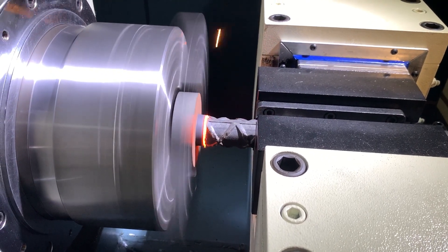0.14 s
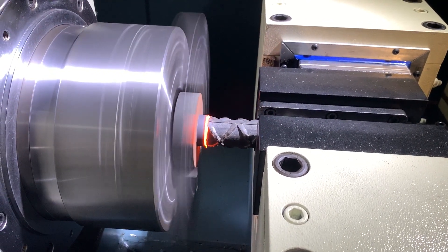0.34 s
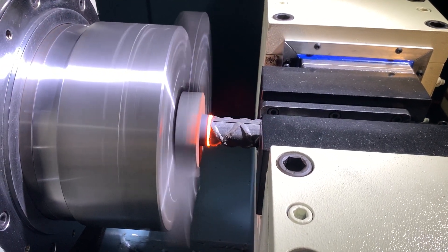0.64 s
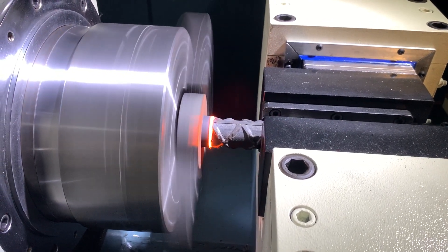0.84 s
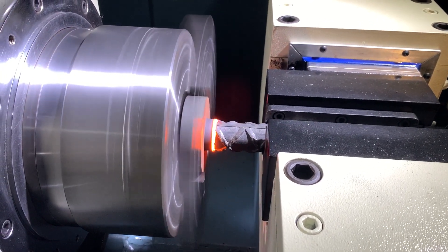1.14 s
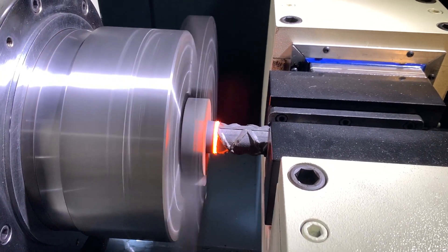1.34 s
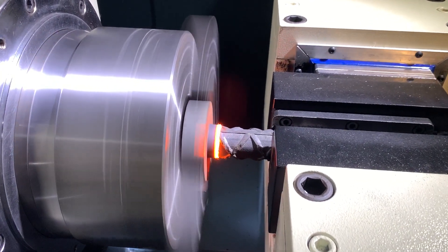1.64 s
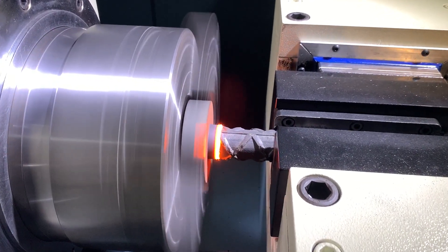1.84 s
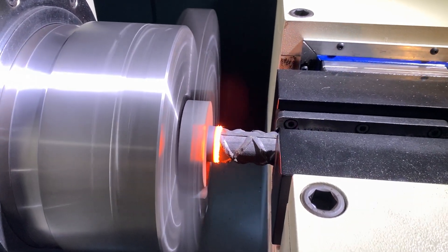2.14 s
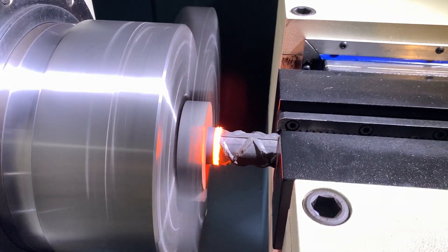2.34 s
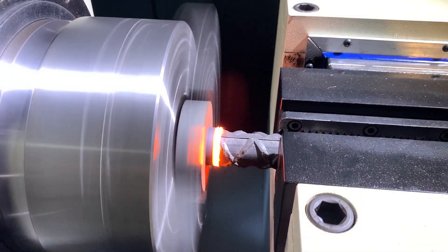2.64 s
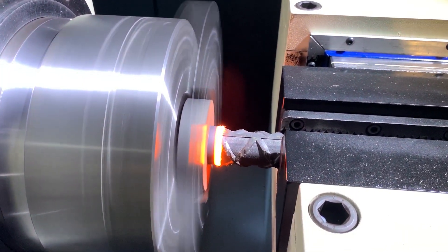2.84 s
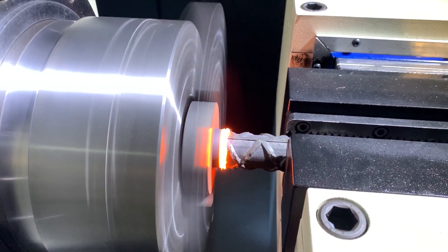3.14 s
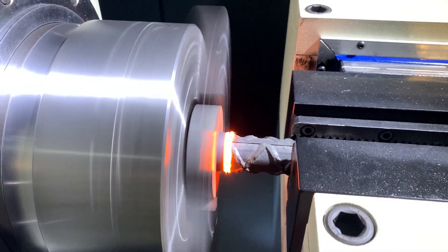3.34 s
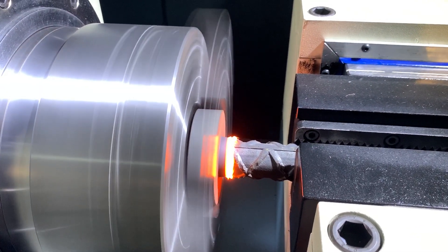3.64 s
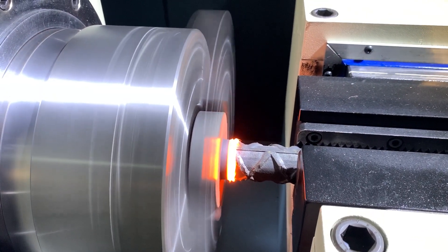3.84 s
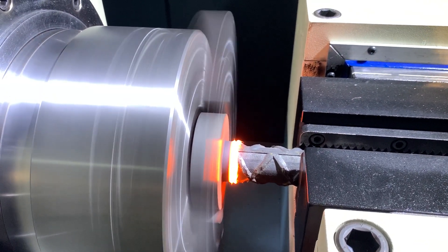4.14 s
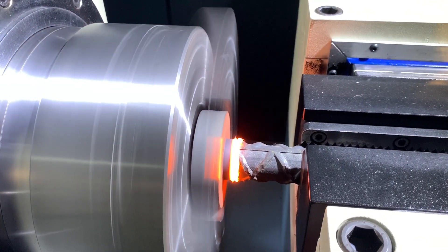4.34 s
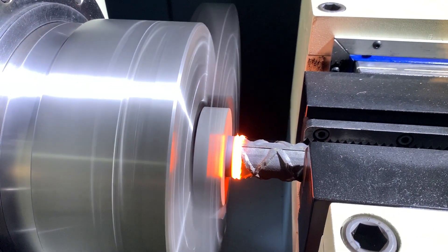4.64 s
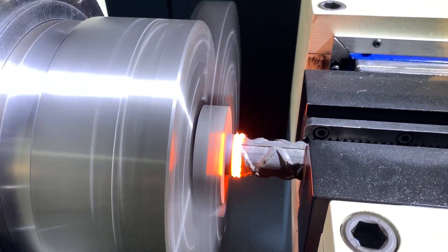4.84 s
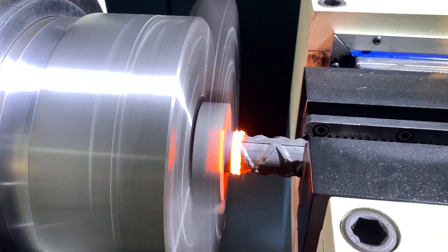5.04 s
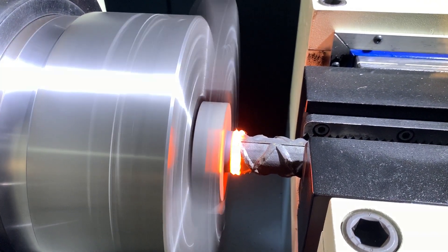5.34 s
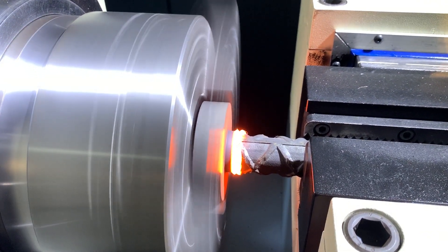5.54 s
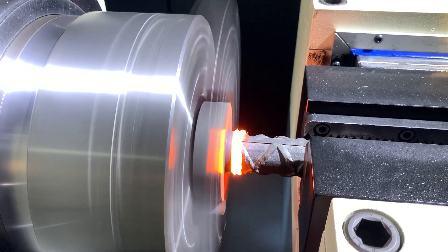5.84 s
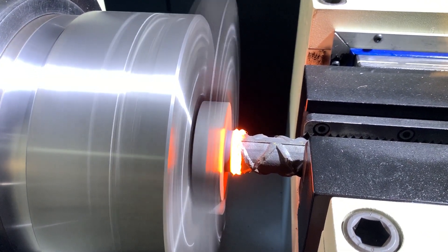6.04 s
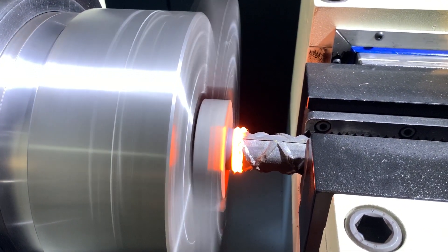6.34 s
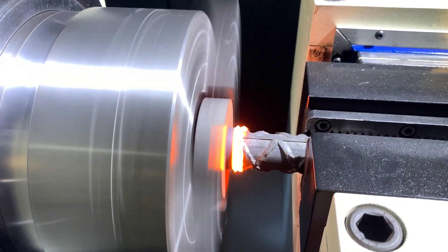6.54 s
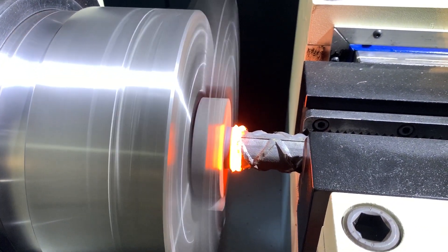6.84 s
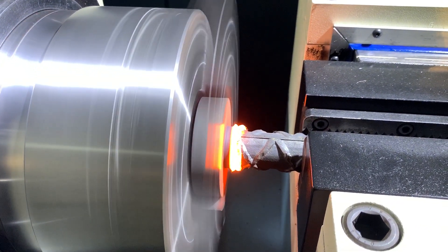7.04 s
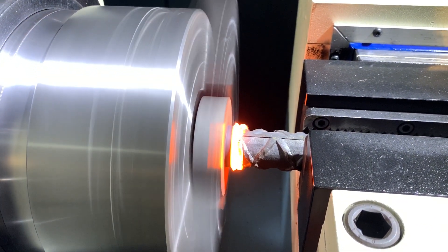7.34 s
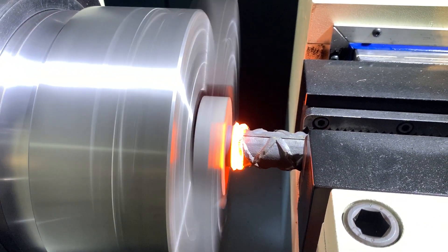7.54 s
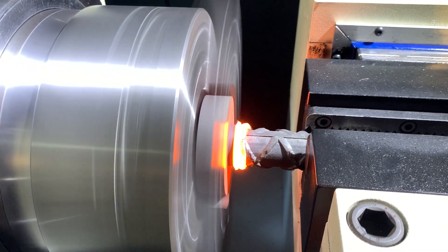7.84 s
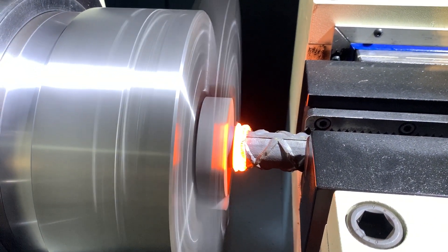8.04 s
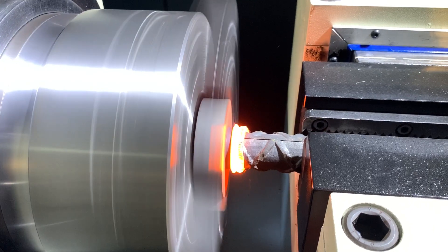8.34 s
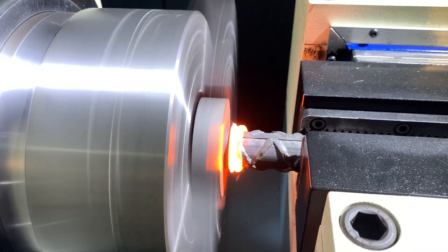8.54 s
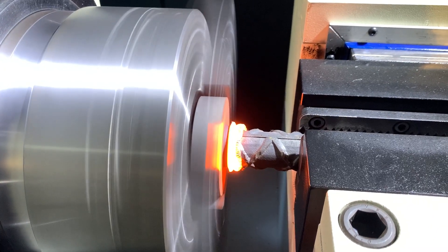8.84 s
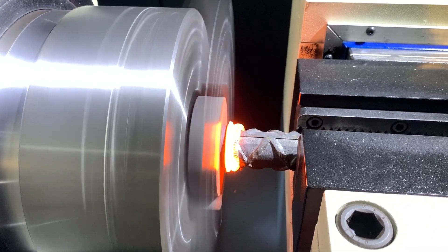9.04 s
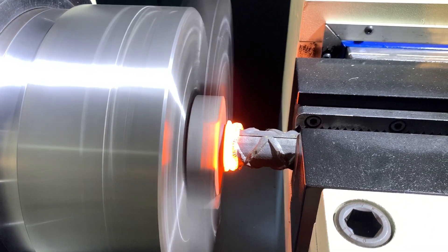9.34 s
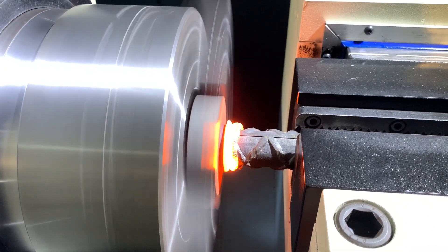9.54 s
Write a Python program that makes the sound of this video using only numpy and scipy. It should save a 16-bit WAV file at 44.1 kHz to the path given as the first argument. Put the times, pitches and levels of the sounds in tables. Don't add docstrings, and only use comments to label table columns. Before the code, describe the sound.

Steady high mechanical whine from a fast spinning machine spindle, with gritty roar, low hum and hiss, plus occasional dull bumps on the microphone.

```python
import sys
import numpy as np
from scipy import signal
from scipy.fft import irfft
from scipy.io import wavfile
from scipy.ndimage import uniform_filter1d

SR = 44100
rng = np.random.default_rng(int(sys.argv[2]) if len(sys.argv) > 2 else 0)


def output_pcm(signal):
    pcm = np.clip(np.atleast_2d(signal).T, -1, 1) * 32767
    wavfile.write(sys.argv[1], SR, np.round(pcm).astype(np.int16))


def volts_from_decibels(level):
    exponent = np.asarray(level, float) / 20
    return 10 ** exponent


N = 427769

TEETH, HUM_ORDER, CAGE_ORDER = 47, 3, .405
TOOTH_HZ, SOUND_MM_PER_S = 1394, 343000
LOADED_HZ, FREE_HZ = 29.604, 29.684
PUMP_LOADED_HZ, PUMP_FREE_HZ = 29.832, 29.89
HUM_DB, HUM_SHORT_DB, HUM_GROW_S, HUM_WAVER_DB = -37.5, -14.5, 2.5, 0.9
ROAR_LOADED_DB, ROAR_FREE_DB, RUMBLE_LOADED_DB, RUMBLE_FREE_DB = -2, -0.3, -4.5, -2.7
CONTROL_S = np.arange(0, N / SR + 1, 1 / 64)

# time in seconds, shaft speed in Hz (turns per second).
SHAFT_SPEED = [(0, 29.619), (.5, 29.604), (.99, 29.61), (1.74, 29.625), (2.74, 29.636), (4.23, 29.665),
               (5.22, 29.678), (6.22, 29.687), (7.46, 29.683), (9.7, 29.68)]
# order of the drive shaft, loaded level in dB, free level in
# dB, left lead in rad.
DRIVE_ORDERS = [(9.98, -58, -56, -.2), (12.29, -58, -54, .6), (15, -55, -52, .4), (24.89, -60, -57, -2.8),
                (47.79, -55, -54, -2.8), (48.01, -60, -50, 2.5), (48.6, -46, -41, 2.3),
                (49.01, -56, -50, 2.4), (49.73, -55, -54, 3.1), (51.99, -57, -56, -1.4),
                (53.7, -58, -55, -1.2), (57.72, -58, -53, -2.6), (69.6, -59, -57, .2), (91.01, -60, -51, 2),
                (93, -55, -50, 1.5), (94.98, -51, -52, 1.2), (95.62, -50, -52, 1.8), (97.02, -56, -51, .5),
                (98.78, -61, -48, 3), (99, -51, -51, 2.4), (100, -57, -53, .7), (139.83, -51, -53, -1.7),
                (142.18, -49, -51, -3.1), (158.08, -56, -51, .2), (170.23, -62, -52, .8),
                (182.02, -59, -53, -2.6), (199.86, -52, -52, -.7), (200.4, -59, -53, -1.1),
                (223.62, -48, -46, 1), (235, -49, -56, -.3),
                (45.4, -60, -56, .6), (142, -47, -55, .7), (193.3, -48, -52, .5), (198.5, -53, -51, .5),
                  (271.94, -43, -54, -1.2), (88, -54, -53, 2), (104, -62, -51, 2), (5, -52, -56, .3)]
# time in seconds, change in mm of the echo path by wall, by bed and by guard.
HAND_DRIFT = [(0.0, 1, -1, -3), (0.15, 3.5, 0, 6), (0.45, -5, -3, -12), (0.75, 0, -4, -13.1),
              (1.05, -3.5, -6.4, -6.9), (1.35, -5.2, -15, 24), (1.65, -16, -17, 19.5),
              (1.9, -12, -10, 11.5), (2.15, -11.5, -1, -6.8), (2.4, -4, 10, -5.5), (2.75, 15, 21, 3),
              (3.3, 38, 14, -14.6), (3.85, 72, 11, -23), (4.5, 89.5, 23, -21), (5.5, 110, 22.2, -27),
              (6.6, 114.2, 17, -31.5), (8.0, 119.5, 26.7, -31), (9.7, 115, 29.5, -39)]
# tooth-rate multiple, left and right level in dB, left and right phase in rad.
DIRECT_PATH = [(1, -46.5, -32.5, -1.72, -0.0), (2, -26.5, -29, 0.18, -0.0), (3, -31.5, -35.0, 2.5, 0.011),
               (4, -56.3, -40, -0.4, 0.0)]
# tooth-rate multiple, left and right level in dB, left and right phase in rad.
WALL_ECHO = [(1, -47.5, -37.5, 0.26, 1.25), (2, -46.5, -30.5, 3.5, -3), (3, -49.5, -42, -0.8, -1.4),
             (4, -37.0, -36.0, -0.32, 1.8)]
# tooth-rate multiple, left and right level in dB, left and right phase in rad.
BED_ECHO = [(1, -49.5, -33, 2.6, -2.93), (2, -31.0, -44, 2.72, 0.76), (3, -38.5, -28.5, 0.31, -3.09),
            (4, -50, -38.5, 3, -0.75)]
# tooth-rate multiple, left and right level in dB, left and right phase in rad.
GUARD_ECHO = [(1, -42.5, -51.5, -0.9, -2.85), (2, -30.5, -31.5, -3, 2.4), (3, -39.5, -41.1, 1.35, -2.5),
              (4, -49, -40, -0.92, 0.9)]
# order of the
# pump shaft, loaded level in dB, free level in dB, left lead in rad.
PUMP_ORDERS = [(30, -45, -48, -1.9), (48, -49, -50, -1.1), (54, -51, -52, 2), (66, -57, -52, -.9),
               (72, -59, -51, -1.6), (78, -55, -50, 2.5), (84, -53, -51, -2.4), (90, -54, -54, -.5),
               (96, -49, -50, 2.3), (102, -56, -54, -1.6), (108, -53, -48, .1), (114, -54, -42, 2.1),
               (120, -48, -54, 1.4), (126, -53, -47, -3.1), (138, -57, -53, 2.8), (144, -43, -42, 2.2),
               (150, -44, -50, .1), (156, -51, -45, -.7), (162, -48, -45, 1.5), (168, -53, -48, -2.5),
               (174, -49, -51, 2.6), (180, -55, -54, -2.5), (192, -49, -47, -2.8), (198, -46, -49, -2.1),
               (210, -65, -54, .2), (216, -50, -54, -1.1), (228, -57, -54, 1.7), (246, -56, -59, 3.1),
               (252, -53, -60, -2.1), (258, -58, -55, -1.6),
               (79, -62, -57, -2.7), (81, -57, -55, 1.1), (83, -62, -54, 3.1), (91, -63, -55, -1.4),
                 (149, -54, -49, -.1), (151, -51, -51, 2.2), (158, -61, -51, .9), (175, -56, -50, 0),
                 (193, -60, -48, -.1), (197, -54, -46, -2.9), (223, -59, -48, 1.2), (42, -54, -59, 2.3),
                 (60, -56, -62, 1), (264, -50, -60, 0)]
# start in seconds, thud peak in dB, final thud pitch in Hz, thud length in seconds,
# knock peak in dB.
HOUSING_BUMPS = [(2.862, -28, 63.6, 0.023, -33), (2.91, -31, 60, 0.027, -50), (5.032, -30, 72, 0.015, -36),
                 (5.753, -40, 90, .015, -30.5), (5.851, -26, 71, 0.025, -33),
                 (5.865, -30, 80, 0.016, -30.5), (6.118, -31, 70, 0.03, -32), (6.256, -32, 60, .02, -39),
                 (7.81, -25, 55, 0.031, -29), (8.443, -27, 50, 0.023, -35), (8.487, -45, 60, .015, -36),
                 (9.224, -29, 58.4, 0.028, -32)]
# frequency in Hz, density in dB per Hz.
ROAR_SPECTRUM = [(18, -82), (30, -74), (50, -65), (120, -68), (250, -71), (600, -72), (1100, -76),
                 (1800, -73), (2400, -70), (3400, -71), (4400, -66), (5400, -68), (7000, -76), (9500, -95)]
# frequency in Hz, shared part from 0 to 1.
ROAR_LIKENESS = [(25, .6), (60, .8), (150, .88), (300, .88), (500, .6), (800, .35), (3000, .25)]
# frequency in Hz, width in Hz, level in dB over the roar.
CASING_PANELS = [(172, 40, 6.5), (301, 8.7, 4), (359, 21, 9), (445.8, 9.2, 12), (55, 21, 5.5), (659, 28, 7),
                 (1428, 98, 9), (2793, 72, 7), (4200, 130, 4.5), (6610, 480, 7)]
# frequency in Hz, density in dB per Hz.
HISS_SPECTRUM = [(4500, -80), (6000, -78.5), (7500, -73.5), (8200, -69), (9000, -75.5), (10000, -77),
                 (12000, -84), (13000, -79.5), (15500, -91.5), (16000, -110)]
# frequency in Hz, left over right in dB.
PORT_TILT = [(300, 0), (800, 3), (1300, 1), (3300, 0), (4500, 0), (6500, -4), (8200, -2.5), (9500, -0.5)]


def gearbox():
    turns = np.cumsum(curve(*np.transpose(SHAFT_SPEED))) / SR
    hum_db = HUM_DB + HUM_SHORT_DB * np.exp(-CONTROL_S / HUM_GROW_S) + HUM_WAVER_DB * wander(9.3)
    hum = volts_from_decibels(hum_db)
    out = tone(HUM_ORDER * turns, [hum * np.exp(.38j), hum])
    flutter_turns = curve(CONTROL_S, .008 * wander(20))
    for k in range(4):
        out += tone((k + 1) * (TEETH * turns + flutter_turns), paths(k) * volts_from_decibels(.5 * wander(25)))
    shaft_turns = turns + curve(CONTROL_S, 0.00023 * wander(1.8))
    cage_turns = CAGE_ORDER * turns + curve(CONTROL_S, 0.0001 * wander(2.8))
    out += grain(shaft_turns, db=2.0, spread_db=6)
    out += grain(cage_turns, db=2.5, spread_db=3.5)
    return out + orders(DRIVE_ORDERS, turns, trim_db=-.2, waver_db=1.6, slip_turns=.035, side_db=2)


def paths(k):
    s, *moved_mm = np.transpose(HAND_DRIFT)
    out = 0
    for way, mm in zip((DIRECT_PATH, WALL_ECHO, BED_ECHO, GUARD_ECHO), [0 * s] + moved_mm):
        _, left_db, right_db, left_rad, right_rad = way[k]
        late_rad = 2 * np.pi * (k + 1) * TOOTH_HZ * np.interp(CONTROL_S, s, mm) / SOUND_MM_PER_S
        ports = volts_from_decibels([left_db, right_db]) * np.exp(1j * np.array([left_rad, right_rad]))
        out = out + ports[:, None] * np.exp(-1j * late_rad)
    return out


def pump():
    speed_hz = PUMP_LOADED_HZ + (PUMP_FREE_HZ - PUMP_LOADED_HZ) * ease(np.arange(N) / SR)
    turns = np.cumsum(speed_hz) / SR
    flaws = grain(turns + curve(CONTROL_S, 0.00022 * wander(8)), db=4.5, spread_db=4.0)
    strokes = orders(PUMP_ORDERS, turns, trim_db=-.6, waver_db=1.7, slip_turns=.035, side_db=2)
    return flaws + strokes


def bumps():
    out, t = np.zeros(N), np.arange(8000) / SR
    for s, thud_db, hz, length_s, knock_db in HOUSING_BUMPS:
        sag_turns = hz * (t + 2.38 * 0.01135 * (1 - np.exp(-t / 0.0067)))
        thud = -np.sin(2 * np.pi * sag_turns) * np.tanh(t / 0.0099) * np.exp(-(t / (1.3 * length_s)) ** 2)
        knock_hz = 300 + 100 * rng.random()
        knock = -np.sin(2 * np.pi * knock_hz * t) * (t / 0.002) * np.exp(1 - t / 0.0027)
        part = out[round(s * SR):][:len(t)]
        part += volts_from_decibels(thud_db) * thud + volts_from_decibels(knock_db) * knock
    return out


def hall():
    frames, hz = N // 512 + 5, np.fft.rfftfreq(2048, 1 / SR)
    patches = uniform_filter1d(rng.standard_normal((frames, len(hz))), size=6, axis=0)
    patches = uniform_filter1d(patches, size=12, axis=1).T
    patches /= patches.std()
    free = ease(np.arange(frames) * 512 / SR)
    roar_db = ROAR_LOADED_DB + (ROAR_FREE_DB - ROAR_LOADED_DB) * free
    rumble_db = RUMBLE_LOADED_DB + (RUMBLE_FREE_DB - RUMBLE_LOADED_DB) * free
    low = 1 / (1 + (hz / 500) ** 4)[:, None]
    swell_db = low * rumble_db + (1 - low) * roar_db
    roar_field_db = casing_db(hz)[:, None] + swell_db + 1.2 * patches
    roar_lead_rad = 3.5 / (1 + (620 / (hz + 1)) ** 4)
    roar = noise(hz, roar_field_db, read(ROAR_LIKENESS, hz), roar_lead_rad)
    hiss_lead_rad = -2 * np.pi * (hz - 590) / 3220
    alike = np.interp(hz, [7000, 9000, 10500], [.7, .5, .96])
    hiss = noise(hz, read(HISS_SPECTRUM, hz)[:, None] + 1.35 * patches, alike, hiss_lead_rad)
    return roar + hiss


def casing_db(hz):
    ringing = sum((volts_from_decibels(2 * db) - 1) / (1 + (2 * (hz - f) / width) ** 2) for f, width, db in CASING_PANELS)
    return read(ROAR_SPECTRUM, hz) + 10 * np.log10(1 + np.maximum(ringing, 0))


def noise(hz, field_db, same, lead_rad):
    a, b, c, d = rng.standard_normal(field_db.shape[::-1] + (4,)).T
    same = np.clip(same, 0, 1)[:, None]
    right = a + 1j * b
    left = same * right * np.exp(1j * lead_rad)[:, None] + np.sqrt(1 - same ** 2) * (c + 1j * d)
    half_tilt = np.array([.5, -.5])[:, None, None]
    z = np.array([left, right]) * volts_from_decibels(field_db + half_tilt * read(PORT_TILT, hz)[:, None])
    return signal.istft(z * np.sqrt(SR / 2048 * 1.5), nperseg=2048, noverlap=1536)[1][:, :N]


def tone(turns, ports):
    angle = (2 * np.pi * (turns % 1)).astype(np.float32)
    cos, sin = np.cos(angle), np.sin(angle)
    return np.sqrt(2) * np.array([curve(CONTROL_S, p.real) * cos - curve(CONTROL_S, p.imag) * sin for p in ports])


def orders(table, turns, trim_db, waver_db, slip_turns, side_db):
    out, free = np.zeros((2, N), np.float32), np.clip(ease(CONTROL_S), 0, 1)
    for order, loaded_db, free_db, lead_rad in table:
        level_db = loaded_db + (free_db - loaded_db) * free + trim_db + waver_db * wander(6)
        size = curve(CONTROL_S, np.sqrt(2) * volts_from_decibels(level_db)).astype(np.float32)
        slip = curve(CONTROL_S, slip_turns * wander(8) + rng.random())
        angle = (2 * np.pi * ((order * turns + slip) % 1)).astype(np.float32)
        lean = volts_from_decibels((read(PORT_TILT, order * FREE_HZ) + side_db * rng.standard_normal()) / 2)
        out[0] += size * np.cos(angle + np.float32(lead_rad)) * np.float32(lean)
        out[1] += size * np.cos(angle) / np.float32(lean)
    return out


def grain(turns, db, spread_db):
    order = np.arange(2049)
    hz = order * turns[-1] * SR / N
    thin_db = -10 * np.log10(1 + (700 / (hz + 1)) ** 4)
    shape_db = casing_db(hz) + thin_db + spread_db * rng.standard_normal((2, len(order)))
    phase = np.exp(2j * np.pi * rng.random((2, len(order))))
    one_turn = irfft(volts_from_decibels(shape_db + db) * phase) * len(order)
    place = np.arange(one_turn.shape[1]) / one_turn.shape[1]
    return np.array([np.interp(turns % 1, place, wave, period=1) for wave in one_turn])


def ease(t):
    return (np.interp(t, *np.transpose(SHAFT_SPEED)) - LOADED_HZ) / (FREE_HZ - LOADED_HZ)


def wander(top_hz):
    hz = np.geomspace(.6, top_hz, 16)[:, None]
    waves = (np.sin(2 * np.pi * (hz * CONTROL_S + rng.random(hz.shape))) / np.sqrt(hz)).sum(0)
    return waves / waves.std()


def curve(s, value):
    return np.interp(np.arange(N) / SR, s, value)


def read(points, hz):
    f, value = np.transpose(points)
    return np.interp(np.log(hz + 1), np.log(f + 1), value)


def scene():
    return gearbox() + pump() + bumps() + hall()


def low_pass(x):
    return signal.sosfilt(signal.butter(12, 15650, fs=SR, output="sos"), x)


def record(dry):
    return low_pass(dry)


dry = scene()
out = record(dry)
output_pcm(out)
```